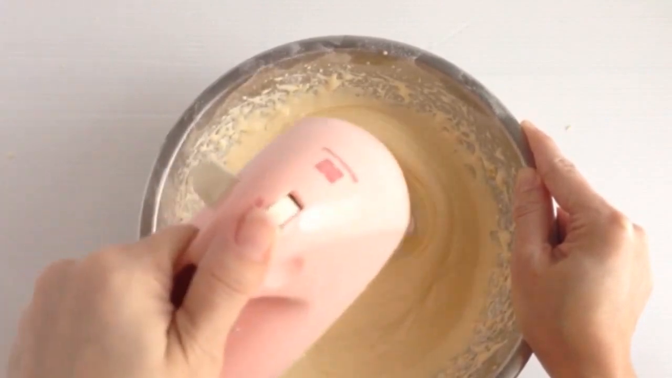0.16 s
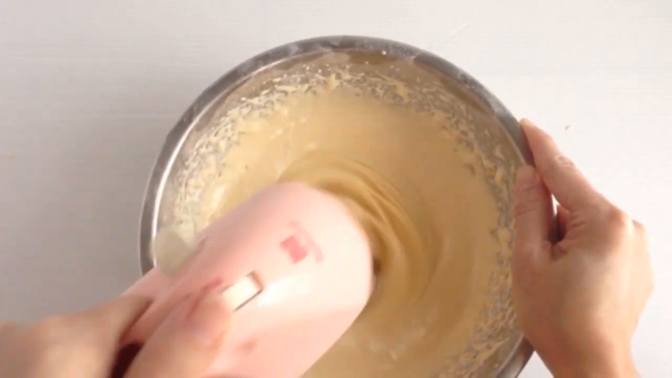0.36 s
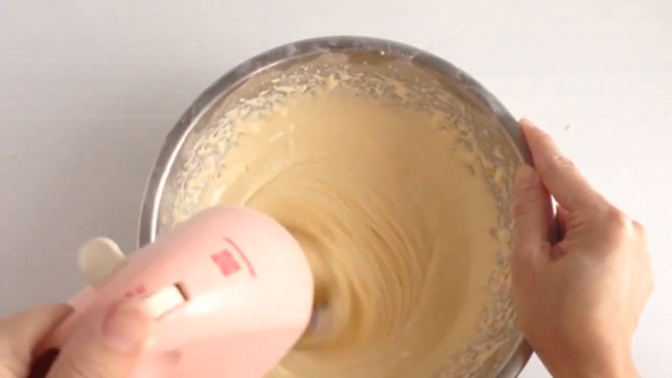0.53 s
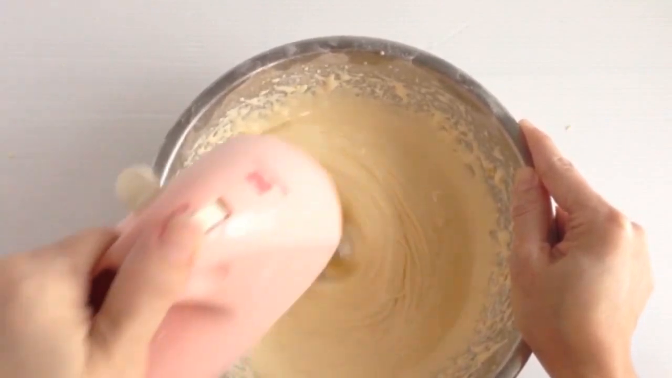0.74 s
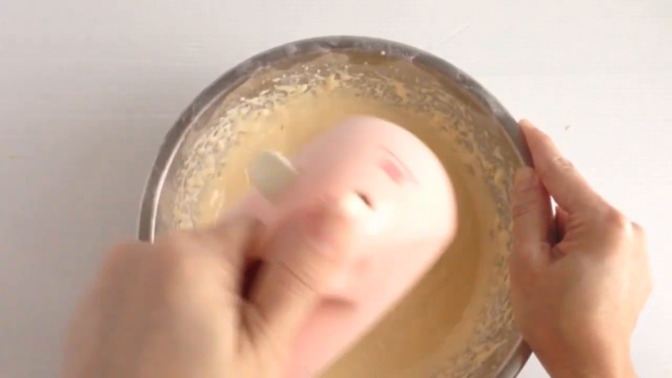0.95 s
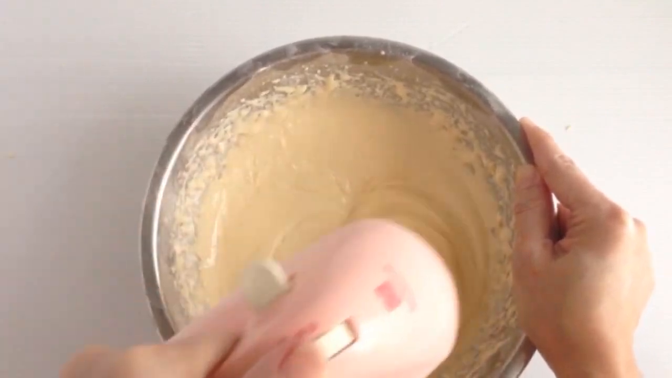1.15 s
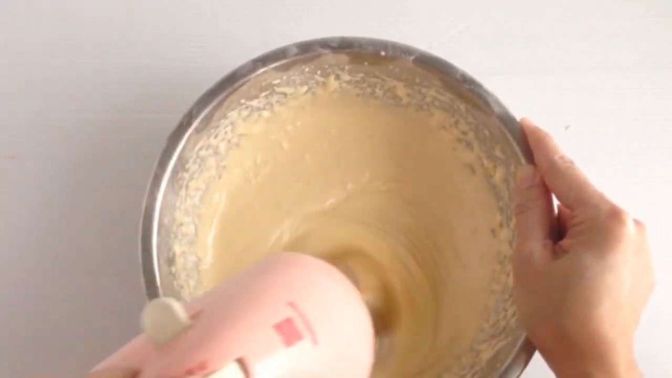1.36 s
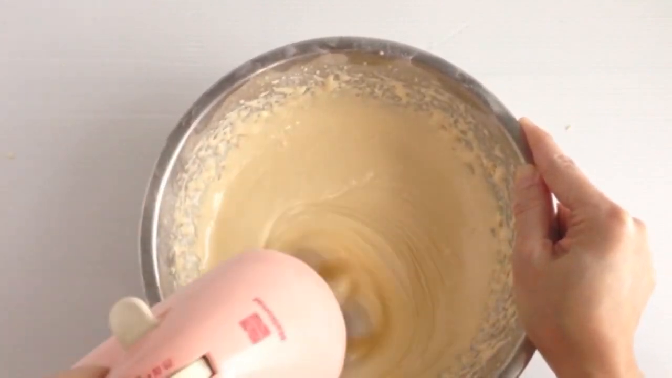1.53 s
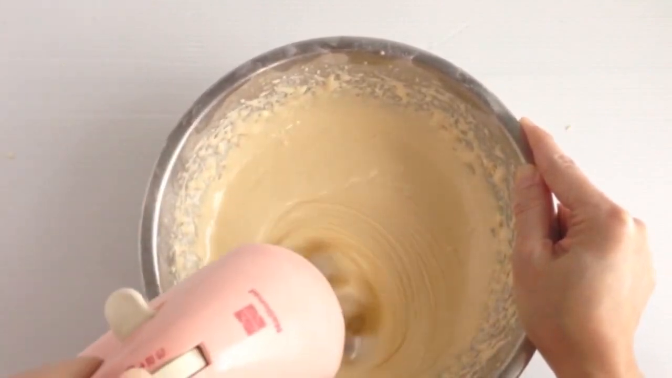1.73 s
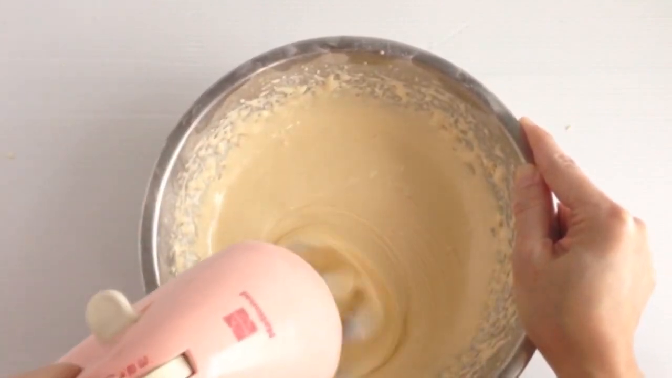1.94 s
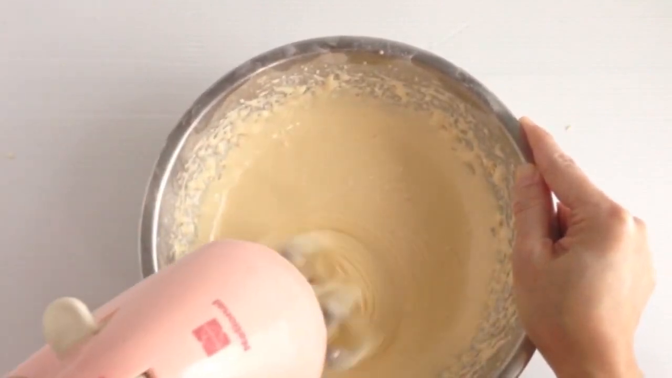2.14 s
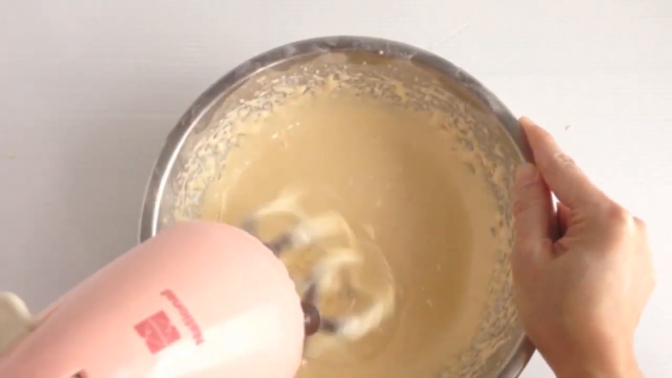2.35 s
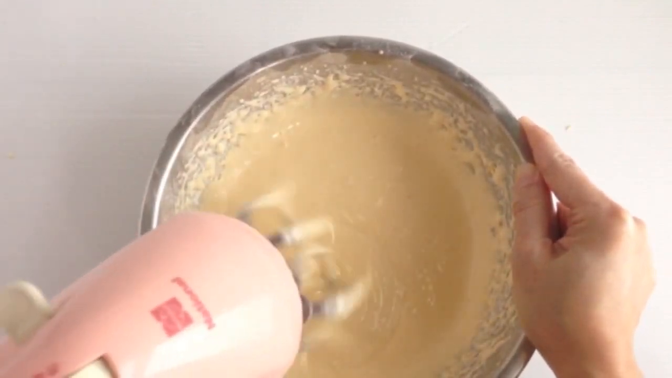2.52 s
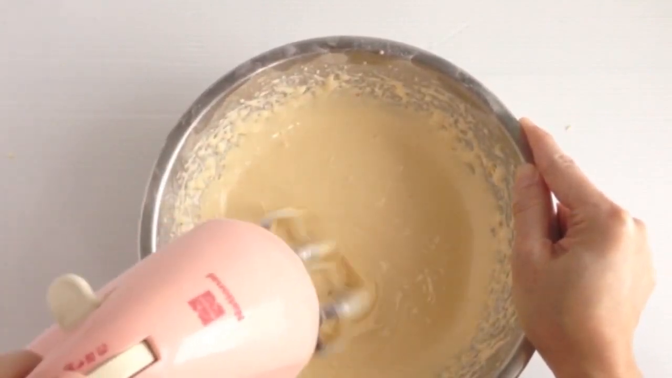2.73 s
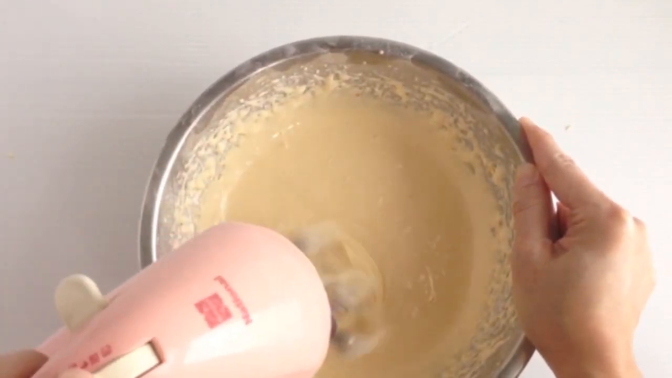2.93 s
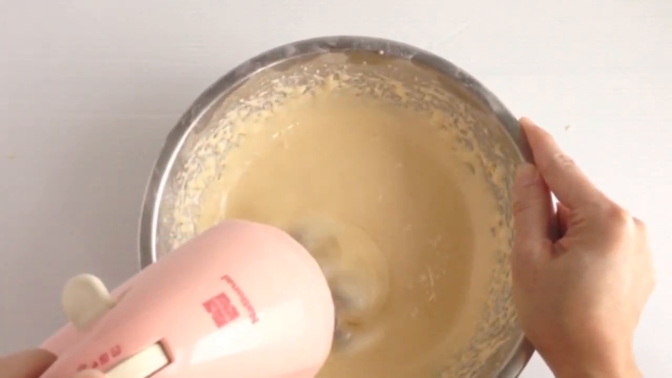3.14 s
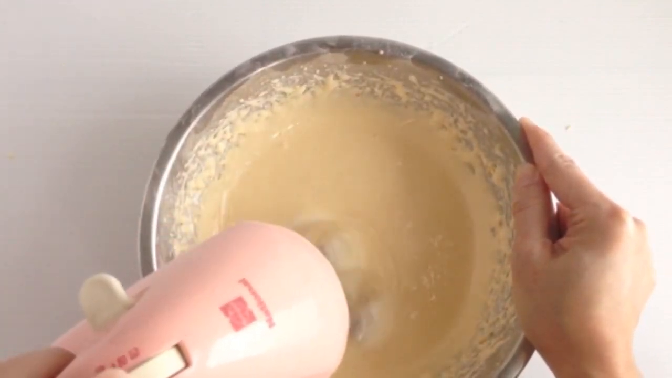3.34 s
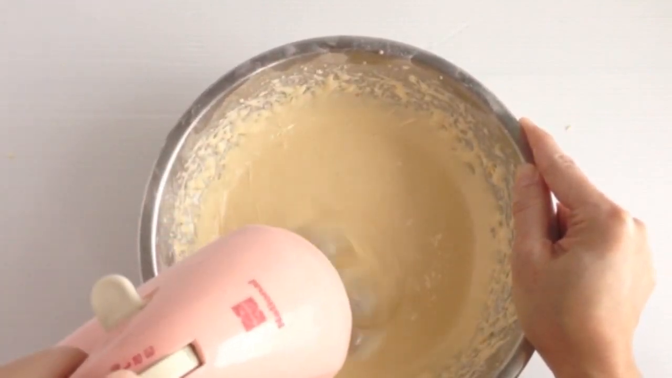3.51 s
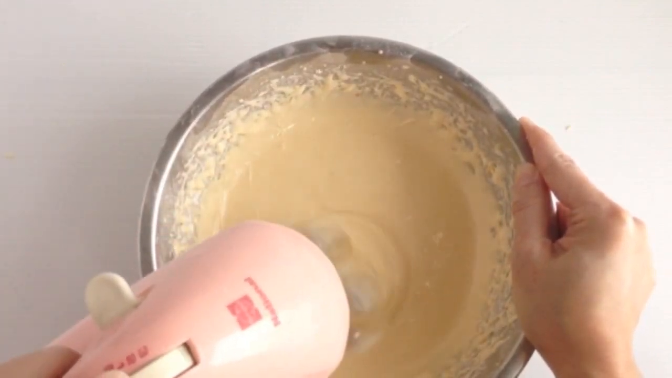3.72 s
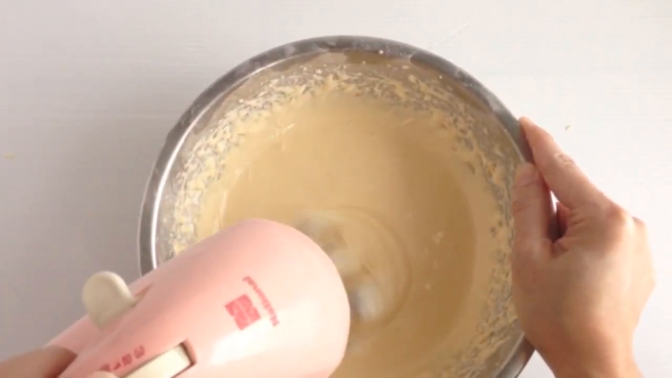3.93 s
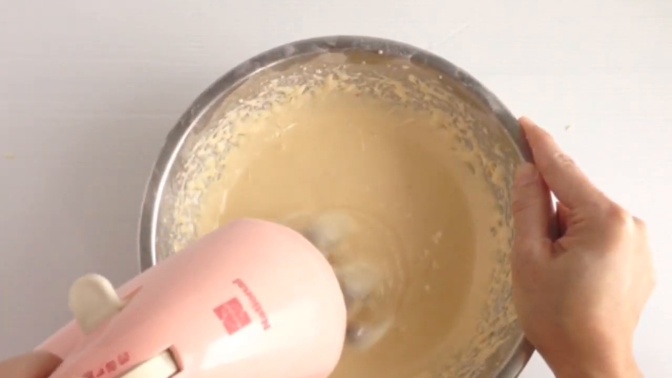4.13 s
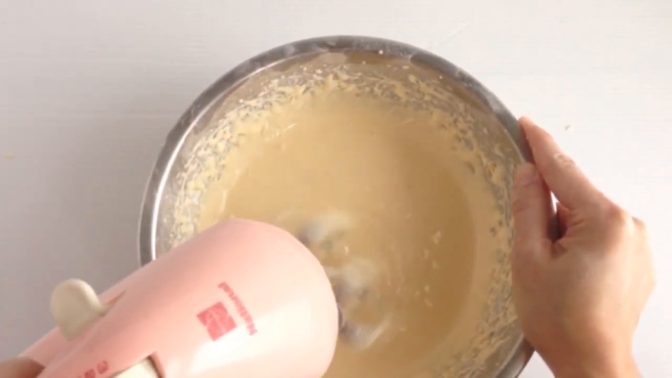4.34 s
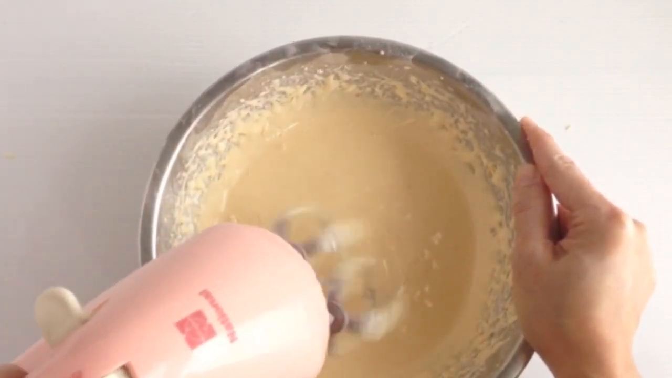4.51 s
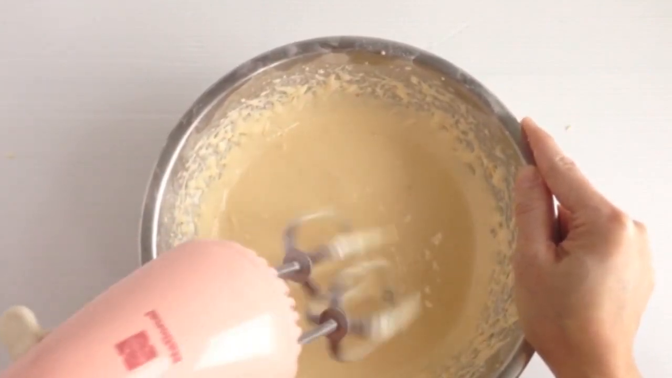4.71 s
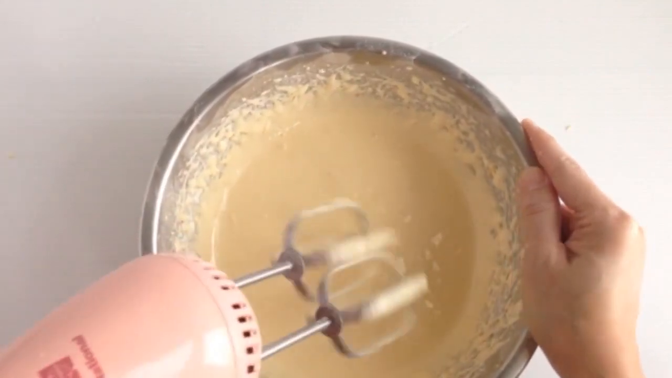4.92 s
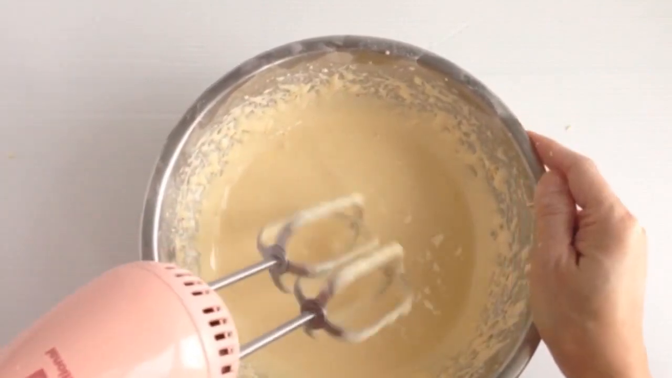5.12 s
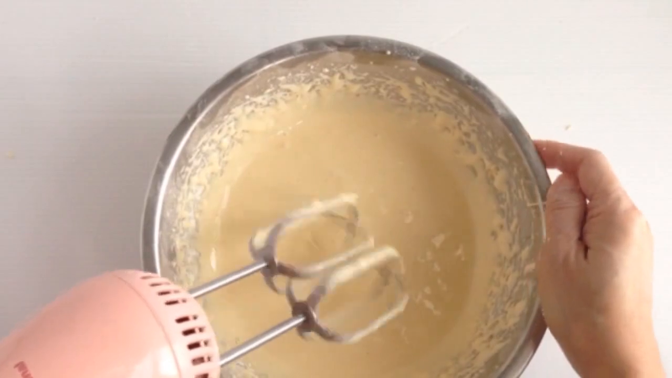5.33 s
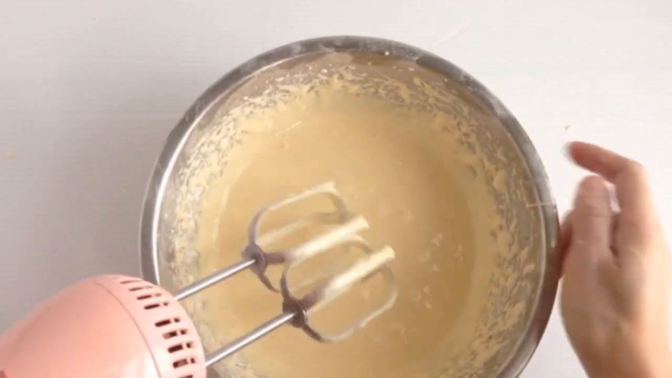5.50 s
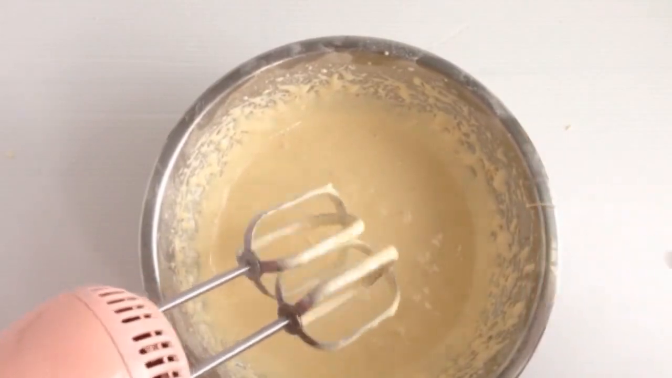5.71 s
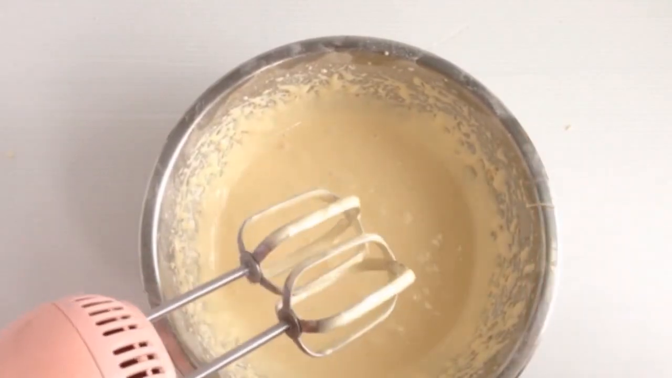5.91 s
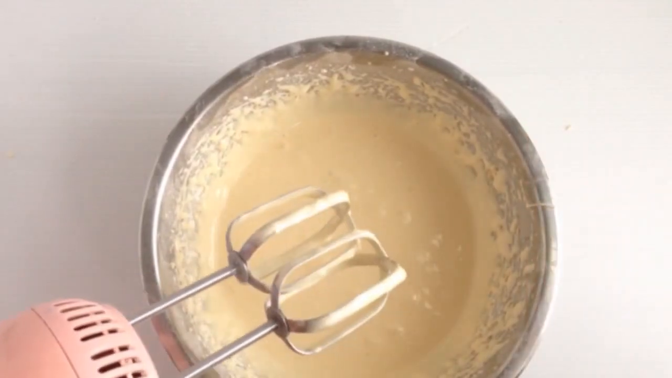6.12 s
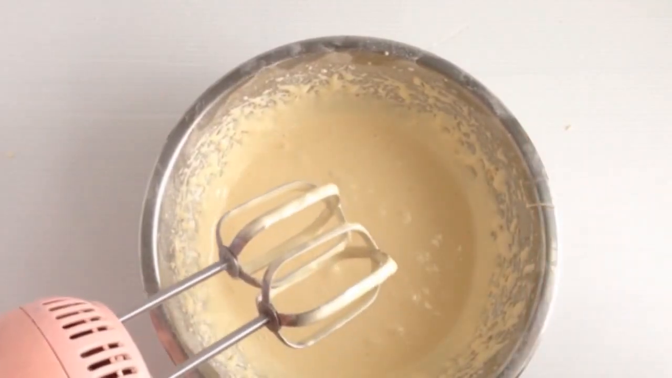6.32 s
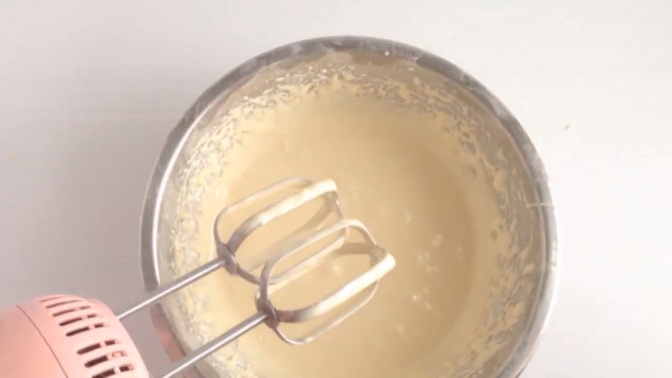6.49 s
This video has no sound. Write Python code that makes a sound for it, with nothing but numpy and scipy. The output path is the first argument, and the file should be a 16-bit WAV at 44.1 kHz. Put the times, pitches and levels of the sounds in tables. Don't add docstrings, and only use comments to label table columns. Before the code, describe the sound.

Close mixer motor whine with dull metallic bowl knocks, a sharp switch snap, falling pitch, a short rev upward, another snap and a long fading spin-down.

```python
import sys
import numpy as np
from scipy import signal
from scipy.fft import rfft, irfft
from scipy.io import wavfile
from scipy.ndimage import uniform_filter1d, map_coordinates

SR = 44100
rng = np.random.default_rng(int(sys.argv[2]) if len(sys.argv) > 2 else 0)


def nominal_scale(level):
    x = np.asarray(level, float) / 20
    return 10 ** x


def store_wav(level_fs):
    pcm = np.round(np.clip(np.atleast_2d(level_fs), -1, 1) * 32767)
    wavfile.write(sys.argv[1], SR, pcm.T.astype(np.int16))


N = 289291

# start_s, stop_s
POWER_SPELLS = [
    (0, 1.544),
    (2.936, 3.488),
]
# pitch_hz, width_hz, lift_db
STEEL_RINGS = [(1663, 300, 18.5), (2300, 160, -1.5), (3210, 190, 13.5)]
EDGE_PITCH = 3.4


def rms_one(x):
    return x / np.sqrt(np.mean(x ** 2) + 1e-20)


def coloured(x, points):
    hz, db = np.transpose(points)
    grid = np.fft.rfftfreq(N + 4095, 1 / SR) + 1
    gain = nominal_scale(np.interp(np.log(grid), np.log(hz), db))
    return irfft(rfft(x, N + 4095) * gain)[:N]


def drift(rate, count=1):
    r = np.exp(-80 * np.pi * rate / SR)
    chance = rng.standard_normal((count, N // 40 + 2002))
    slow = signal.lfilter([1], [1, -2 * r, r * r], chance)[:, 2000:]
    return np.array([np.interp(np.arange(N) / 40, np.arange(len(v)), rms_one(v)) for v in slow])


def band(x, low_hz, high_hz):
    return signal.sosfilt(signal.butter(3, [low_hz, high_hz], "band", fs=SR, output="sos"), x)


def lifted(x, modes):
    for hz, width, db in modes:
        b, a = signal.iirpeak(hz, hz / width, fs=SR)
        x = x + (nominal_scale(db) - 1) * signal.lfilter(b, a, x)
    return x


def swell(t, start, stop):
    return np.sin(np.pi * np.clip((t - start) / (stop - start), 0, 1)) ** .7


def casing(x):
    # pitch_hz, level_db (per Hz)
    colour = [(120, -47), (200, -21), (479, -13), (653, -15.5), (728, -12.5), (858, -20.5), (1070, -5),
              (1350, -14), (1880, -6.5), (2750, -10.5), (4260, 1.5), (10600, -26.5), (12500, -13),
              (15500, -4.5)]
    # pitch_hz, width_hz, lift_db
    resonances = [(484, 20, 4.5), (703, 210, 5.5), (1122, 186, 6.5), (1742, 116, 11.5), (1885, 44, 6.5),
                  (2360, 260, 8), (3137, 340, 7.5), (3480, 69, 6), (4540, 67, 3.5), (4830, 130, 3.5),
                  (5450, 580, 4), (6540, 810, 5.5), (12950, 3260, 8)]
    return lifted(coloured(x, colour), resonances)


def repeats(turns):
    # every_nth, lift_db
    standing_out = [
        (4, 2),
        (12, 1),
        (36, 3),
    ]
    order, steps = np.arange(1, 133), 130
    db = sum(lift * (order % every == 0) for every, lift in standing_out)
    db = db - 1.2 * np.log2(1 + (order / 27) ** 2) - 4 * (order < 7) - 5 * (order < 26) + 1
    waver_db = 4.6 * rng.standard_normal((steps, len(order)))
    slip = np.cumsum(rng.standard_normal((steps, len(order))), axis=0)
    slip = slip * (.03 + order / 2500)
    lines = np.zeros((steps, 1025), complex)
    lines[:, order] = nominal_scale(db + waver_db - 3) * np.exp(2j * np.pi * (rng.random(len(order)) + slip))
    patterns = irfft(lines, 2048, axis=1) * 1024
    return map_coordinates(patterns, [np.linspace(0, steps - 1, N), turns % 1 * 2047], order=1)


def motor_noise(t, turns_hz, turns, powered):
    pulsing = 1 + 0.058 * np.sin(2 * np.pi * turns) + 0.071 * powered * np.sin(2 * np.pi * 100 * t)
    noise = rng.standard_normal(N) * pulsing * nominal_scale(0.7 * drift(42.0)[0])
    settle = 9000
    coasting = (1 - powered) * (1 - uniform_filter1d(powered, size=settle, origin=settle // 2 - 1))
    under_power, coasting_free = .16, 1.1
    share = under_power + (coasting_free - under_power) * coasting * np.minimum(turns_hz / 85, 1)
    tones = np.sqrt(4 * share * turns_hz / SR) * repeats(turns)
    return casing((noise + tones) / np.sqrt(1 + share))


def whine(t, turns, speed_db, powered):
    # start_s, slot_db, far_lower_db, near_lower_db, upper_db (mains sidebands)
    loaded_whine = [(0, -33, -37, -46.5, -40.5), (.08, -51, -29.5, -53, -43), (.16, -32.5, -52, -41, -38),
                    (.28, -33, -32, -37, -38), (.42, -37.5, -40, -33, -41), (.55, -40.5, -63, -30.5, -48),
                    (.68, -48, -48.5, -36, -50), (.8, -41, -54, -39, -55.5), (.92, -40.5, -50, -34, -33),
                    (1.05, -39.5, -42, -31, -32.5), (1.15, -34, -49, -36, -41.5),
                    (1.25, -48, -44, -43, -39), (1.4, -38, -37, -50, -56), (1.52, -43.5, -58, -37, -53)]
    side_offsets = [
        -200,
        -100,
        100,
    ]
    free_sides = [
        -48,
        -45,
        -47,
    ]
    # pitch_hz, width_hz, lift_db
    housing_rings = [(1720, 150, 15), (1860, 90, 5), (2055, 70, 10)]
    slope = 2.6
    s, slot_points, *side_points = np.transpose(loaded_whine)
    buried_db = -11 * (t < 1.72)
    loaded = t < POWER_SPELLS[0][1]
    free_db = np.where(powered > .5, 6.5, -0.0 + 1) + slope * speed_db
    slot_db = np.where(loaded, np.interp(t, s, slot_points), -53.5 + free_db + buried_db)
    waver, angle = drift(18.5, count=6), 2 * np.pi * turns
    sides = 0
    for k, (offset, db, free) in enumerate(zip(side_offsets, side_points, free_sides)):
        side_db = np.where(loaded, np.interp(t, s, db), free) + 2.0 * waver[k]
        sides = sides + nominal_scale(side_db) * np.sin(12 * angle + 2 * np.pi * offset * t + .8 * waver[k + 1])
    sides = powered * np.where(loaded, 1, nominal_scale(slope * speed_db)) * sides
    slot = nominal_scale(1.5 * waver[3]) * np.sin(12 * angle + .7 * waver[0])
    fan = nominal_scale(3.0 * waver[4]) * np.sin(10 * angle) + nominal_scale(4.0 * waver[5] - 2) * np.sin(11 * angle)
    fan_db = -66 + buried_db + slope * speed_db
    slot_gain, fan_gain = uniform_filter1d(nominal_scale([slot_db, fan_db]), size=600)
    lines = np.sqrt(2) * (lifted(slot_gain * slot + fan_gain * fan, housing_rings) + sides)
    return rms_one(casing(lines)) * np.std(lines)


def panels(t):
    # start_s, stop_s, pitch_hz, width_hz
    turned = [(.2, .42, 760, 160), (0, .65, 3250, 300), (.5, .62, 1850, 120), (.7, .86, 2490, 40),
              (1.2, 1.4, 1560, 120), (1.35, 1.6, 1760, 100), (1.75, 2.5, 4470, 200), (1.75, 2.3, 4900, 150),
              (2.15, 2.5, 4210, 90), (2.93, 3.1, 1450, 500), (3.2, 3.5, 1150, 250), (4.6, 5.35, 1950, 300),
              (4.95, 5.3, 2450, 300), (4.85, 5.5, 6500, 600), (4.9, 6.0, 4350, 160), (4.9, 5.95, 3480, 110),
              (3.28, 3.5, 2150, 350), (1.7, 2.3, 1860, 160), (3.5, 5.1, 4200, 130), (3.5, 4.3, 5500, 120),
              (3.5, 4.2, 6750, 120), (3.6, 4.0, 1080, 140), (4.85, 5.4, 12000, 2500), (2.93, 3.0, 800, 400)]
    panel_levels = [-35, -41.5, -33, -38.5, -33.5, -34, -50.5, -47, -48.5, -49, -36.5, -46.5, -51.5, -57.5,
                    -59.5, -63.5, -44.5, -42.5, -47.5, -50.5, -57, -43, -57.5, -39.5]
    noise, out = rng.standard_normal(N) * nominal_scale(3.5 * drift(30.0)[0]), 0
    for (start, stop, hz, width), db in zip(turned, panel_levels):
        ring = signal.iirpeak(hz, hz / width, fs=SR)
        rung = signal.lfilter(*ring, signal.lfilter(*ring, noise))
        out = out + nominal_scale(db) * swell(t, start, stop) * rms_one(rung)
    return out


def blooms(t, turns):
    # start_s, stop_s, level_db
    coast_lines = [(1.67, 1.955, -35), (1.785, 2.306, -46.5), (1.823, 2.217, -59), (1.83, 2.1, -42),
                   (1.9, 2.32, -52), (1.928, 2.35, -62), (1.94, 2.217, -41), (1.962, 2.2, -57),
                   (1.969, 2.282, -55), (1.98, 2.47, -56), (1.992, 2.62, -50), (1.99, 2.186, -52),
                   (2.006, 2.347, -49.5), (2.02, 2.766, -48.5), (2.028, 2.477, -44.5),
                   (2.167, 2.715, -54.5), (2.213, 2.88, -63), (2.23, 2.585, -47), (2.287, 2.86, -63),
                   (2.34, 2.932, -59), (2.35, 2.57, -64), (2.4, 2.65, -55), (2.47, 2.69, -61.0),
                   (2.51, 2.89, -51), (2.52, 2.802, -54.0), (3.47, 3.735, -37), (3.504, 4.177, -38),
                   (3.6, 3.91, -50), (3.64, 3.91, -43), (3.68, 3.91, -45), (3.72, 4.144, -45),
                   (3.74, 4.357, -45), (3.79, 4.18, -40), (3.795, 4.09, -49.5), (3.82, 4.03, -39),
                   (3.89, 4.09, -56), (3.91, 4.65, -42.5), (4.02, 4.212, -46), (4.033, 4.317, -43.5),
                   (4.06, 4.32, -40), (4.073, 4.34, -49), (4.113, 4.446, -50.5), (4.12, 4.873, -42.5),
                   (4.15, 4.7, -54), (4.203, 4.504, -42.5), (4.21, 4.67, -59), (4.24, 4.52, -52.0),
                   (4.433, 4.76, -51.0), (4.45, 4.89, -58), (4.47, 4.75, -43.5), (4.57, 4.99, -45),
                   (4.58, 4.8, -58), (4.767, 5.04, -57), (4.937, 5.25, -51), (5.03, 5.296, -59),
                   (5.2, 5.47, -57)]
    coast_multiples = [12, 13, 8, 23, 4, 14, 15, 12, 6, 10, 24, 9, 16, 20, 18, 7, 11, 23, 19, 12, 16, 13, 9,
                       25, 15, 10, 12, 4, 11, 13, 7, 8, 23, 3, 21, 13, 16, 9, 14, 24, 13, 4, 20, 10, 15, 6,
                       18, 7, 11, 18, 24, 5, 6, 25, 12, 24]
    # start_s, stop_s, level_db
    brush_lines = [(1.69, 2.08, -50.0), (1.7, 2.01, -64.0), (1.86, 2.19, -60.0), (2.02, 2.93, -64.0),
                   (2.16, 2.74, -69.0), (2.17, 2.46, -57.0), (2.22, 2.48, -54.0), (2.23, 2.54, -65.0),
                   (2.23, 2.54, -57.0), (2.24, 2.64, -62.0), (2.26, 2.58, -70.0), (2.28, 2.53, -59.0),
                   (2.33, 2.8, -61.0), (2.39, 2.74, -55.0), (2.39, 2.72, -68.0), (2.46, 2.79, -63.0),
                   (2.51, 2.86, -63.0), (2.51, 2.93, -64.0), (2.52, 2.93, -59.0), (3.75, 5.06, -65.0),
                   (3.75, 4.04, -54.0), (3.82, 4.14, -49.0), (3.87, 4.18, -52.0), (3.96, 4.26, -71.0),
                   (4.04, 4.69, -62.0), (4.21, 4.51, -64.0), (4.24, 5.06, -63.0), (4.25, 4.6, -68.0),
                   (4.35, 4.77, -56.0), (4.39, 4.88, -64.0), (4.41, 4.73, -65.0), (4.52, 4.83, -69.0),
                   (4.59, 4.94, -63.0), (4.79, 5.24, -62.0), (4.96, 5.41, -56.0), (5.11, 5.38, -64.0)]
    brush_multiples = [36, 60, 48, 72, 64, 48, 45, 60, 42, 37, 68, 36, 29, 26, 70, 44, 60, 42, 36, 60, 37,
                       36, 30, 72, 48, 51, 72, 64, 44, 52, 70, 76, 49, 42, 36, 72]
    # start_s, stop_s, level_db
    run_up = [(3.03, 3.14, -44), (3.125, 3.3, -32), (3.12, 3.3, -38), (3.28, 3.44, -43), (3.24, 3.42, -35),
              (3.27, 3.47, -40), (3.26, 3.45, -42)]
    run_up_pitches = [(12, 200), (12, 0), (12, 100), (12, 0), (13, 0), (10, 0), (12, -100)]
    # pitch_hz, level_db
    housing_pass = [(900, 0), (1100, 1), (1400, -4), (1750, 2), (1950, 1), (2200, -5), (2700, -8),
                    (3500, -8), (4300, -4), (9000, -1)]
    waver, out = drift(24.0, count=5), np.zeros(N)
    spans = [*coast_lines, *brush_lines, *run_up]
    pitches = [(k, 0) for k in [*coast_multiples, *brush_multiples]] + [*run_up_pitches]
    for k, ((start, stop, db), (multiple, offset)) in enumerate(zip(spans, pitches)):
        on = (t > start) & (t < stop)
        phase = 2 * np.pi * (multiple * turns[on] + offset * t[on])
        phase = phase + (.6 + multiple / 40) * waver[(k + 1) % 5, on]
        pitch_hz = multiple * np.gradient(turns[on]) * SR + offset
        line_db = db + np.interp(pitch_hz, *np.transpose(housing_pass)) + 3 + 3.5 * waver[k % 5, on]
        out[on] += nominal_scale(line_db) * swell(t[on], start, stop) * np.sin(phase)
    return out


def jolt(t):
    after = np.clip(t - POWER_SPELLS[1][0], 0, 1)
    shape = (1 - np.exp(-after / 0.0214)) * np.exp(-after / 0.041)   # rise, fade in s
    return nominal_scale(-36.5) * shape / shape.max() * rms_one(casing(band(rng.standard_normal(N), 420, 1570)))


def motor():
    # start_s, turns_hz
    rotor_speed = [(0, 192.6), (.3, 195.5), (.75, 190.8), (1.2, 195), (1.545, 194.5), (1.8, 153),
                   (2, 127.2), (2.09, 118.8), (2.3, 102.5), (2.59, 81.6), (2.936, 56.8), (3.046, 104),
                   (3.1, 127), (3.142, 140), (3.2, 152.5), (3.3, 168.7), (3.4, 181.5), (3.488, 188),
                   (3.6, 178), (3.8, 161), (4.17, 133.6), (4.43, 115.5), (4.73, 94.7), (5.03, 72.4),
                   (5.27, 55.5), (5.6, 33.5), (6.05, 8)]
    # start_s, nearness_db, vents_db (vents turned to the microphone)
    held = [(0, 2.5, -2), (.4, 1.1, 0), (.75, 3, -2), (1.2, 0, 1), (1.55, 0, 0.4), (1.9, 2.5, -2),
            (2.297, -1.2, -2), (2.9, -0.8, 0), (3.05, 1.5, -2.5), (3.45, 2.7, -1), (3.9, 3.5, -2.5),
            (4.15, -0.6, -1), (4.55, 1.5, -2.5), (5.1, -1.5, -0.5), (5.4, -5.5, 4.5), (5.65, -8.5, 7.5),
            (5.85, -10, 6), (6.1, -5, 13)]
    # low_hz, high_hz
    layer_bands = [
        (900, 1450),
        (1450, 2080),
        (2080, 2800),
        (250, 900),
        (2800, 7500),
        (7500, 10800),
        (10800, 15500),
        (3200, 6500),
    ]
    # full_speed_db, slope (dB per dB of speed), power_db, pressing_db, share of the vents
    layer_laws = [(-36.5, 1.0, 1, 5, 0.065), (-35, 1.0, 1.5, 0, 0.044), (-40, 0.83, 2.5, 3.5, 0.11),
                  (-39, 1.66, 0.9, 8, .05), (-35.5, 1.5, -0.45, -3.5, 1.35), (-45, 1, 0.5, -0.5, 1.57),
                  (-49.5, 0.65, -1.25, 2.5, 1.1), (-62, 0.03, 8.5, 9, 0.72)]
    t = np.arange(N) / SR
    s, near, vents = np.transpose(held)
    turns_hz = uniform_filter1d(np.interp(t, *np.transpose(rotor_speed)), size=1500)
    powered = uniform_filter1d(sum((t >= a) & (t < b) for a, b in POWER_SPELLS) * 1., size=200)
    speed_db = 20 * np.log10(turns_hz / 194)
    near_db = np.interp(t, s, near) - 26.5 * np.clip((t - 5.904) / 0.27, 0, 1)
    vents_db = np.interp(t, s, vents)
    pressed = np.interp(t, [0.75, 1.41, 1.85], [0, 1, 0])
    turns = np.cumsum(turns_hz) / SR
    inside = motor_noise(t, turns_hz, turns, powered)
    plain = casing(rng.standard_normal(N))
    out = 0
    for (low, high), (full_db, slope, power_db, press_db, open_share) in zip(layer_bands, layer_laws):
        db = full_db + slope * speed_db + power_db * powered + press_db * pressed
        db = db + near_db + open_share * vents_db + 1.05 * drift(8.5)[0]
        out = out + nominal_scale(db) * band(inside, low, high) / np.std(band(plain, low, high))
    return out + whine(t, turns, speed_db, powered) + jolt(t) + blooms(t, turns) + panels(t)


def room_tone():
    # pitch_hz, level_db
    room_colour = [(15, -46), (25, -29), (48, 0.5), (91, -3.5), (164, 1), (188, -7), (233, -5), (267, -8),
                   (331, -5.5), (421, -8.5), (509, -16), (552, -14), (970, -20.5), (15500, -38.5)]
    air = nominal_scale(-52) * rms_one(coloured(rng.standard_normal(N), room_colour))
    hum_hz = 49.7
    return air + nominal_scale(-68) * rms_one(band(rng.standard_normal(N), hum_hz - 6, hum_hz + 6))


def knocks(rows, sign, lag_s, boom_db, rise_s, damping, spatter_db, spatter_s, edge_db):
    out, t = np.zeros(N), np.arange(round(.15 * SR)) / SR
    spatter = rms_one(lifted(band(rng.standard_normal(N), 810, 8300), STEEL_RINGS))
    rise = 1 - np.exp(-t / rise_s)
    for s, db, hz, t60 in rows:
        i = round((s + lag_s) * SR)
        ring = np.sin(2 * np.pi * hz * t) * nominal_scale(-60 * (t / max(t60, .004)) ** damping)
        whole_bowl = nominal_scale(boom_db) * np.sin(2 * np.pi * 300 * t) * nominal_scale(-60 * t / 0.03)
        edge = nominal_scale(edge_db) * np.sin(2 * np.pi * EDGE_PITCH * hz * t) * nominal_scale(-60 * (t / 0.0086) ** 2)
        flung = nominal_scale(spatter_db) * spatter[i:i + len(t)] * np.exp(-t / spatter_s)
        out[i:i + len(t)] += nominal_scale(db) * rise * (sign * (ring + whole_bowl - edge) + flung)
    return signal.sosfilt(signal.butter(3, 135, "high", fs=SR, output="sos"), out)


def wall_knocks():
    # start_s, peak_db, pitch_hz, t60_s
    strikes = [(0.196, -11, 362, 0.0204), (0.222, -15.5, 384, 0.019), (0.241, -10, 348, 0.015),
               (0.269, -17.5, 375, 0.013), (0.287, -30.5, 390, 0.13), (0.66, -12.5, 405, 0.018),
               (0.682, -7, 416, 0.021), (0.704, -7.5, 434, 0.025), (0.730, -11, 395, 0.014),
               (0.7504, -8, 400, 0.027), (0.802, -10, 365, 0.011), (0.845, -7.5, 370, 0.02),
               (0.89, -7.5, 380, 0.025), (0.916, -13, 366, 0.024), (0.934, -8.5, 362, 0.031),
               (0.957, -21.5, 382, 0.039), (0.981, -7.5, 338, 0.012), (1.003, -24, 394, 0.034),
               (1.131, -18, 430, 0.018), (1.16, -26, 437, 0.0234), (1.182, -17.5, 426, 0.021)]
    return knocks(strikes, -0.84, lag_s=0.001365, boom_db=-13.5, rise_s=0.00049, damping=1.96,
                  spatter_db=-17, spatter_s=0.0084, edge_db=-18)


def table_thuds():
    # start_s, peak_db
    thuds = [
        (0.302, -25),
        (0.698, -16.5),
        (0.905, -24),
        (1.139, -15.5),
        (1.248, -18),
        (1.699, -18),
    ]
    rows = [(s, db, 156, 0.071) for s, db in thuds]
    return knocks(rows, 1.0, lag_s=0.00063, boom_db=-19.5, rise_s=0.007, damping=0.95,
                  spatter_db=-40, spatter_s=.005, edge_db=-40)


def bottom_knocks():
    # crest_s, level_db, pitch_hz
    crests = [(1.2153, -17, 480), (1.2395, -11, 650), (1.2672, -21, 590), (1.2903, -8.5, 610),
              (1.3194, -12, 490), (1.3433, -10, 550), (1.37, -13.5, 447), (1.394, -8.5, 476),
              (1.4217, -11, 426), (1.4462, -7, 460), (1.4731, -11.5, 417), (1.4969, -7, 450),
              (1.5243, -10.5, 420), (1.5481, -7, 423), (1.5775, -16, 440), (1.6011, -10.5, 470),
              (1.6281, -13.5, 418), (1.6535, -8.5, 434), (1.683, -15, 420), (1.7092, -9, 440),
              (1.7408, -14.5, 396), (1.768, -13, 425), (1.8018, -17, 407), (1.8315, -12.5, 457)]
    out, t = np.zeros(N), np.arange(-400, 2000) / SR
    spatter = rms_one(lifted(band(rng.standard_normal(N), 790, 8200), STEEL_RINGS))
    chance = rng.standard_normal((len(crests), 2))
    for (s, db, hz), (strength, late) in zip(crests, chance):
        i = round(s * SR) - 400
        bell = np.exp(-(t * hz / np.where(t < 0, .45, 0.74)) ** 2)
        blow = bell * (np.cos(2 * np.pi * hz * t) + 0.15 * np.sin(2 * np.pi * hz * t))
        blow = blow - bell * blow.sum() / bell.sum()
        edge = nominal_scale(-8.5) * np.exp(-(t / 0.00027) ** 2) * np.cos(2 * np.pi * EDGE_PITCH * hz * t)
        back = t - 0.00444 * (1 + .1 * late)
        rebound = np.exp(-(back / 0.0019) ** 2) * np.cos(2 * np.pi * 1.47 * hz * back)
        rebound = nominal_scale(-12.5 + 2 * strength) * rebound
        flung = nominal_scale(-16) * spatter[i:i + len(t)] * np.exp(-np.abs(t) / np.where(t < 0, .0003, .008))
        out[i:i + len(t)] += nominal_scale(db) * (blow + edge + rebound + flung)
    return out


def switch():
    # start_s, peak_db, rise_s, rattle_s
    snaps = [
        (1.5435, -15, 0.00114, 0.01),
        (2.831, -47, .002, 0.0064),
        (2.937, -46.5, 0.001034, 0.0129),
        (2.966, -44, 0.0015, 0.0041),
        (3.224, -38, .002, 0.0038),
        (3.484, -22, 0.0053, 0.015),
        (5.781, -60.5, 0.002, 0.0069),
    ]
    # pitch_hz, level_db (per Hz)
    snap_colour = [(530, -41), (900, 13), (1530, -3), (2270, 1), (3340, 4.5), (4100, 9.5), (13200, -5.5),
                   (15200, -6.5), (16000, -47)]
    # pitch_hz, width_hz, lift_db
    slider_rings = [(2287, 200, 12.5), (2820, 134, 12.5), (3560, 270, 10.5), (6800, 190, 0.5)]
    t = np.arange(N) / SR
    uneven_db = 1.7 * rng.standard_normal(N // 30 + 1).repeat(30)[:N]
    impacts = rng.standard_normal(N) * nominal_scale(uneven_db)
    shape = 0
    for s, db, rise, rattle in snaps:
        after = t - s
        fade = np.exp(-np.clip(after - rise, 0, 1) / (4.7 * rattle) - np.clip(after - rattle, 0, 1) / 0.003)
        shape = shape + nominal_scale(db + 4.5) * np.clip(after / rise, 0, 1) * fade
    return shape * rms_one(lifted(coloured(impacts, snap_colour), slider_rings))


def kitchen(x):
    t = np.arange(round(.5 * SR)) / SR
    tail = band(rng.standard_normal(len(t)), 76, 7700) * nominal_scale(-60 * t / 0.65) * (t > .006)
    return signal.fftconvolve(x, tail / np.sqrt(np.sum(tail ** 2)))[:N]


def scene():
    blows = wall_knocks() + bottom_knocks() + table_thuds() + switch()
    return (motor() + blows + nominal_scale(-16) * kitchen(blows) + room_tone())[None]


def band_limit(x):
    return signal.sosfilt(signal.butter(12, 16420, fs=SR, output="sos"), x)


def record(dry):
    dry = signal.sosfilt(signal.butter(3, 42, "high", fs=SR, output="sos"), dry)
    dry = 1.1 * np.tanh(dry / 1.1)
    dry = signal.sosfilt(signal.cheby2(12, 40, 15450, fs=SR, output="sos"), dry)
    return band_limit(dry)


dry = scene()
out = record(dry)
store_wav(out)
```